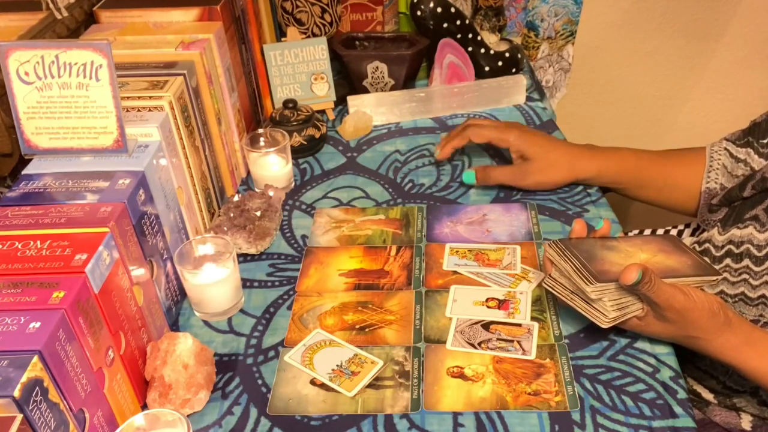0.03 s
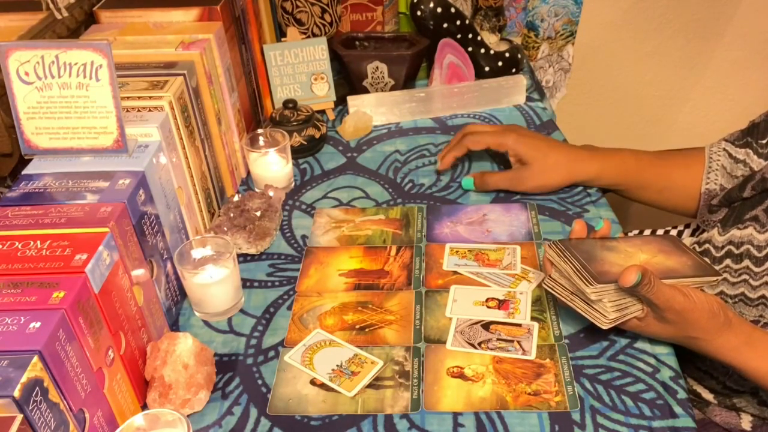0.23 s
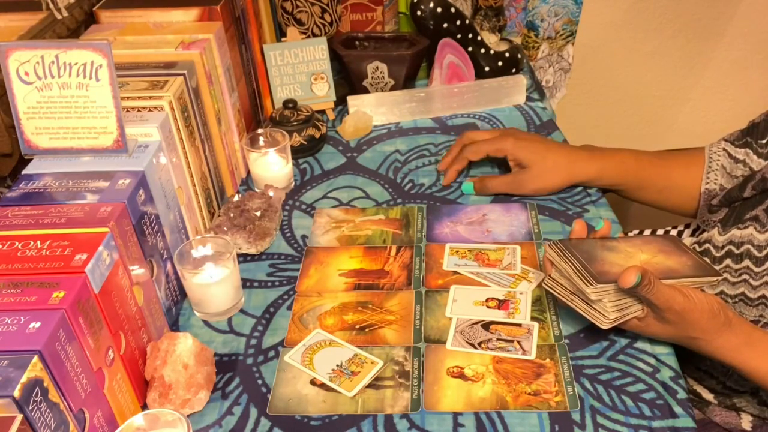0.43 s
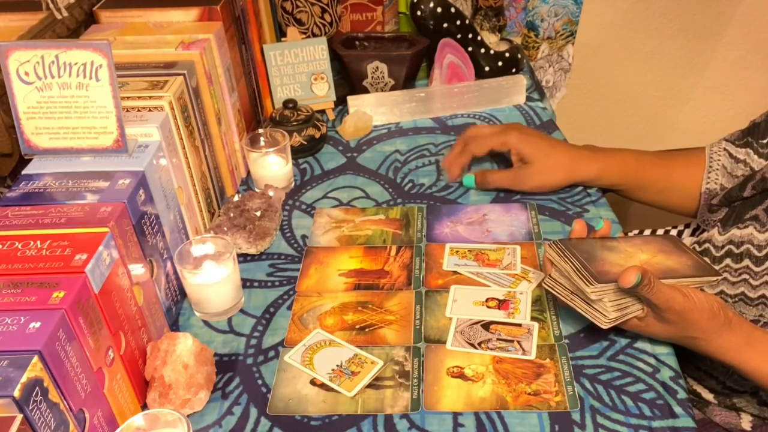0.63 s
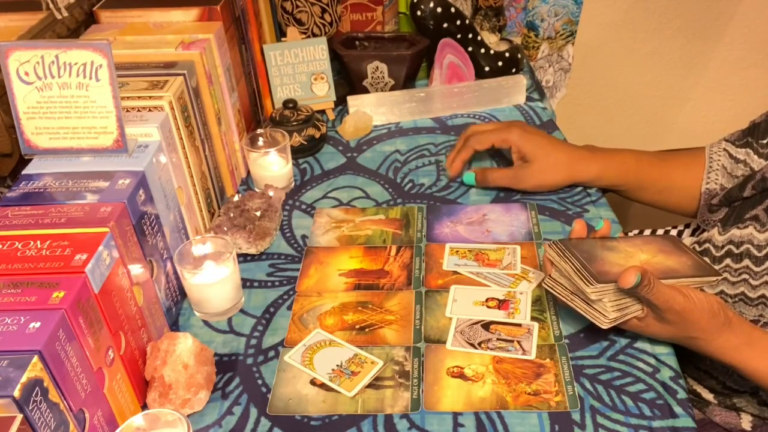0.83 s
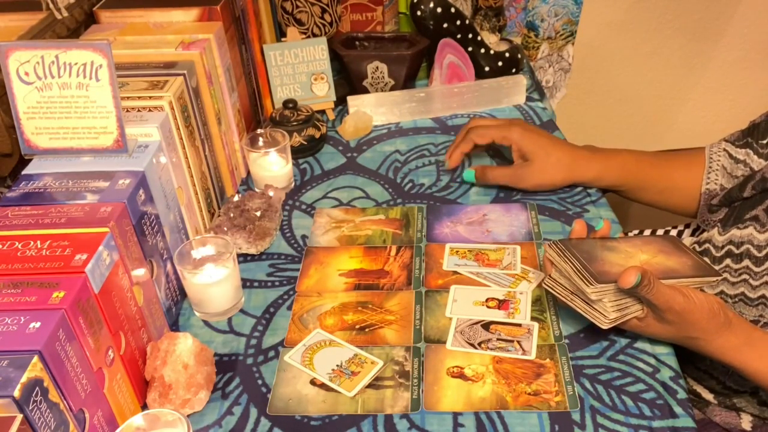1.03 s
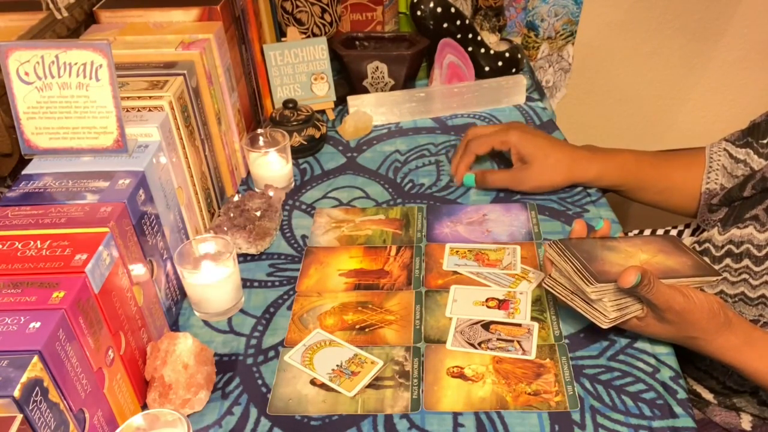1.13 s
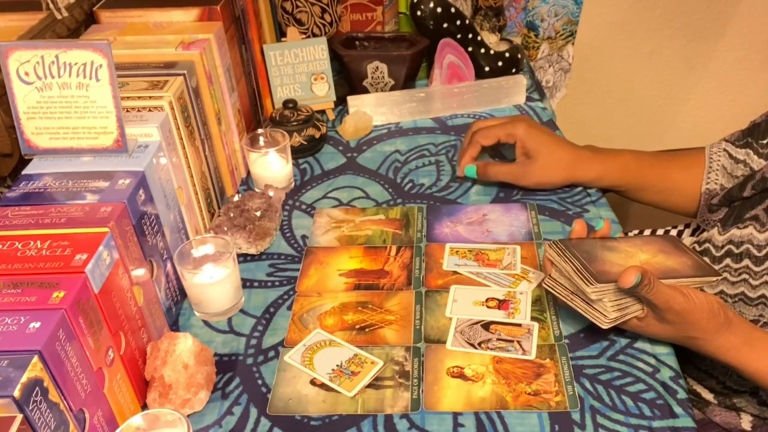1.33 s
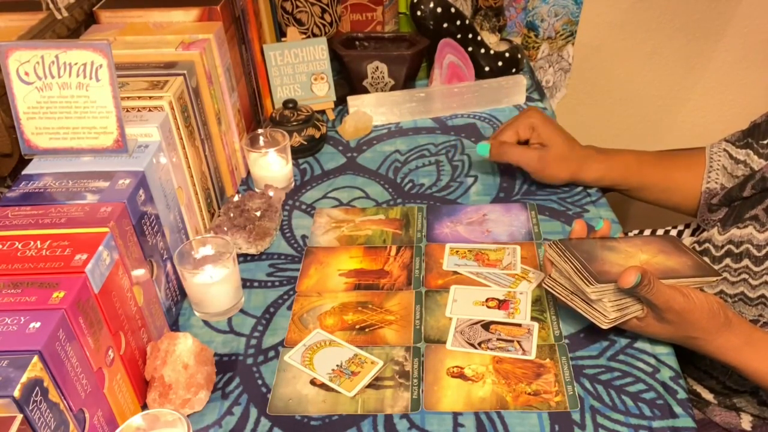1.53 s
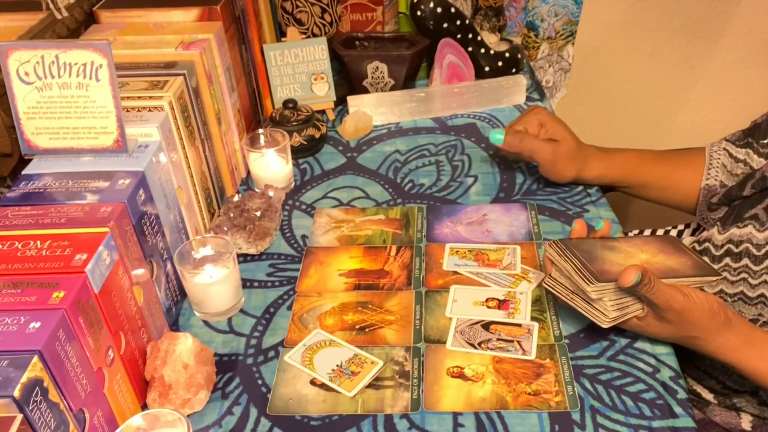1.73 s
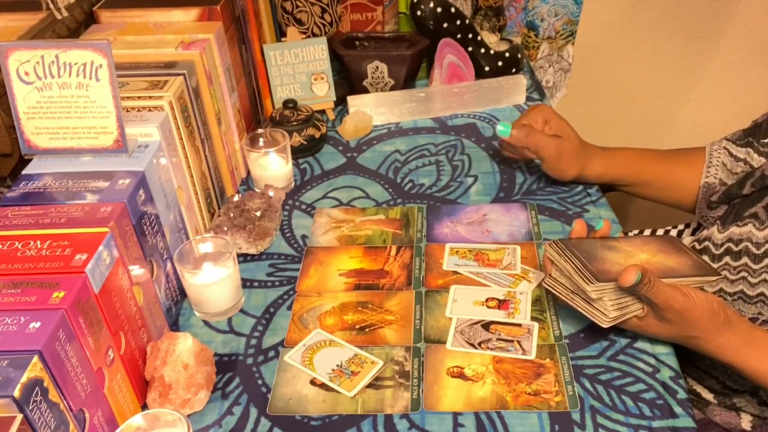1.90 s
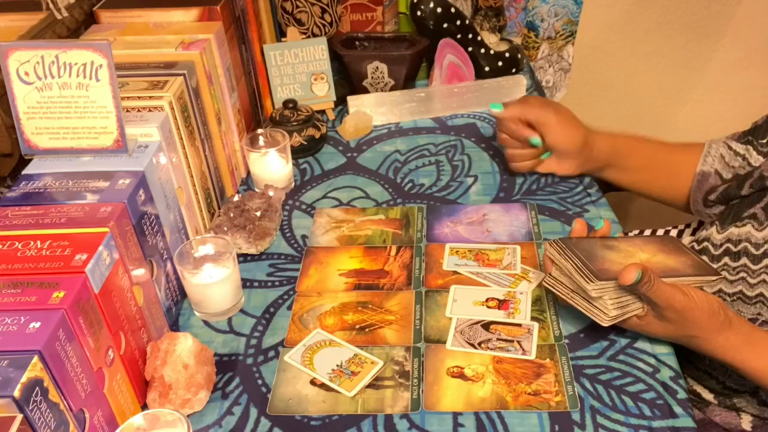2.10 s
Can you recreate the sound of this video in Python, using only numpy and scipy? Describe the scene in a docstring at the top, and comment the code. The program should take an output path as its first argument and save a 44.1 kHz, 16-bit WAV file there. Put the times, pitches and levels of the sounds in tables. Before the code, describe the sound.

One bright finger snap ends a slow, even run of muffled fingertip taps on a covered wooden table. A short room echo, then faint cloth rustles over soft rumble and hiss, picked up closely in stereo.

```python
"""Table taps and a snap

Fingertips tap a cloth-covered wooden table in a quiet room, mostly stronger as they go on, up to a sharp snap.
Each tap is a set of dying waves, knock first and bass later; the snap and the brushes on the cloth are shaped noise.
Behind them lie low rumble, hiss and a thin steady tone; two microphone ports drift apart in phase in the treble."""
import sys
import numpy as np
from scipy import signal
from scipy.fft import rfft, irfft, next_fast_len
from scipy.io import wavfile
from scipy.ndimage import uniform_filter1d

SR = 44100
rng = np.random.default_rng(int(sys.argv[2]) if len(sys.argv) > 2 else 0)


def bounce(signal):
    """Save signal as a 16-bit WAV file at the path given by the first command-line argument."""
    frames = np.transpose(np.atleast_2d(signal))
    limited = np.clip(frames, -1, 1)
    pcm = np.round(limited * 32767).astype(np.int16)
    wavfile.write(sys.argv[1], SR, pcm)


N = 95300  # length in samples

# Taps: [t/s, bass crest after t/s, then level/dB of deep thump, low boom, upper boom, panel, knock, nail tick]
TAPS = [(0.0703, .017, -42, -37.5, -40.5, -61.5, -56, -47.5),
        (0.3145, .016, -39.5, -43, -52, -61, -68, -57), (0.5898, .014, -35, -33, -39, -39.5, -35, -48.5),
        (0.8237, .014, -35.5, -40, -40, -34, -31, -49), (1.071, 0.01263, -38.5, -51, -37, -29, -28, -37.5),
        (1.0776, 0.016, -56, -37.5, -31.5, -31, -26.5, -38),
        (1.333, .014, -53, -50.5, -48.5, -41, -34, -50)]
# Ringing modes of the table, one list for each of the first five tap levels: [f/Hz, level/dB, t60/s]
TABLE_MODES = [
    [(57, 3.5, 0.31)],
    [(101.1, 4, 0.23)],
    [(125.9, 8.5, 0.16)],
    [(188.6, -10.5, 0.2), (233.4, 4.5, 0.085), (277, -10.5, 0.17), (339, -6.5, 0.18)],
    [(422, -14, 0.084), (553, 8, 0.017), (473, -8, 0.071), (642, -11, 0.072), (738, -13, 0.078),
     (1185, -20.5, 0.054), (1440, -18, 0.039)],
]
# Resonances of the nail tick: [f/Hz, width/Hz, level/dB]
NAIL_PEAKS = [(1370, 265, 14.5), (2050, 100, 5), (3380, 560, 6), (4650, 910, 3), (7150, 760, -6)]
# Tiny bright clicks on their own: [t/s, level/dB]
LONE_CLICKS = [(1.1384, -46.5), (1.6556, -49.5)]
# Resonances of those clicks: [f/Hz, width/Hz, level/dB]
CLICK_PEAKS = [(3500, 830, 0), (7400, 2100, 0), (12700, 2700, -4.5)]
# Parts of the snap, a lead-in scrape and then the crack: [t/s, level/dB, rise/s, t60/s]
SNAP_PARTS = [(1.334, -21.5, 0.0013, 0.019), (1.3422, -5.5, 0.0059, 0.035)]
# Resonances of hand and table top in the snap: [f/Hz, width/Hz, level/dB]
SNAP_PEAKS = [(1280, 84, 6.5), (1463, 175, 4), (1774, 330, 5.5), (1975, 58, 9.5), (2180, 53, -9.5),
              (2680, 240, -0.5), (3390, 530, -0.5), (4260, 1160, -5), (6750, 300, -9), (7660, 1200, -17),
              (11600, 3000, -18.5), (15400, 870, -21)]
# Extra brightness of the snap on the left port: [f/Hz, width/Hz, level/dB]
SNAP_LEFT_PEAKS = [(4440, 530, -6.5)]
# Brushes on the cloth: [t/s, length/s, level/dB, brightness/(dB per octave)]
BRUSHES = [(1.364, .09, -56, 0), (1.925, 0.13, -60.5, -1), (2.048, 0.05, -66, 8)]
# Noise colour of the cloth, only its shape counts: [f/Hz, level/(dB per Hz)]
CLOTH_COLOUR = [(400, -8.5), (1000, -10), (1900, -10.5), (3000, -20), (4500, -14.5), (8000, -13),
                (12000, -13), (14000, -13), (15700, -27)]
# How long the room takes to fall by 60 dB: [f/Hz, t60/s]
ROOM_T60 = [(200, 0.28), (2000, 0.18), (10000, 0.1)]
# Noise colour of the rumble, only its shape counts: [f/Hz, level/(dB per Hz)]
RUMBLE_COLOUR = [(12, -41), (20, -7.5), (59, 0), (73, -4), (86, -11), (123, -5), (156, -28), (189, -21),
                 (300, -37), (400, -25.5), (520, -61), (880, -120)]
# Noise colour of the hiss, only its shape counts: [f/Hz, level/(dB per Hz)]
HISS_COLOUR = [(150, 0.5), (400, -3.5), (1000, -12.5), (2500, -17), (6000, -22), (8500, -20),
               (11000, -24.5), (13500, -27), (14500, -29), (15700, -53)]
# Likeness of the noise at the two ports, 1 = the same: [f/Hz, likeness/1]
ALIKE = [(60, 0.81), (200, 0.2), (500, 0.023), (6000, 0.061), (8000, 0.48), (9200, 1), (10100, 0.95),
         (10900, 0.42), (11800, .99), (12800, 0.65), (13400, 0.54), (14200, .99)]
# Phase lead of the right port over the left: [f/Hz, lead/radians]
RIGHT_LEADS = [(0, 0), (6200, 0), (8000, 1.5), (9200, 3.14), (10000, 3.14), (11500, 6.28), (13000, 6.28),
               (14000, 9.42), (16000, 9.42)]

KNOCK_HZ = 528  # modes above this arrive at once
TRAVEL_S = 0.0042  # delay of the bending wave at a quarter of KNOCK_HZ
SWELL_CYCLES, BASS_RISE_S = 0.63, 0.011  # rise of a higher mode in its own cycles; start of bass to crest
GAP_HZ, GAP_WIDTH_HZ = 830, 250  # the table radiates little here
NAIL_T60_S = 0.018
ROOM_DB, SNAP_ROOM_DB = -12, -9  # room echo of the taps and of the snap
RUMBLE_DB, HISS_DB = -56, -66
TONE_HZ, TONE_DB = 1081, -72.5  # level on the left port
TONE_RIGHT = -1.63  # right port's gain against the left; minus turns the wave upside down
PAN_DB, RUMBLE_PAN_DB = 1.1, 0.8  # left up and right down by this much
BOTTOM_HZ, TOP_HZ = 40, 15750  # band that the ports let through


def bass_ring(after, crest, hz):
    """A bass mode swells slowly; its cosine has a peak at the crest shared by all bass modes of the tap."""
    t = np.maximum(after - (crest - BASS_RISE_S), 0)
    swell = 1 - np.exp(-(t / (BASS_RISE_S / np.sqrt(2))) ** 2)
    return t, swell * np.cos(2 * np.pi * hz * (after - crest))


def knock_ring(after, hz):
    """A higher mode swells within about a cycle; bending waves travel slower at low pitch, so it comes later."""
    delay = TRAVEL_S * max(np.sqrt(KNOCK_HZ / hz) - 1, 0)
    t = np.maximum(after - delay, 0)
    swell = 1 - np.exp(-(t / (SWELL_CYCLES / hz)) ** 2)
    return t, swell * np.sin(2 * np.pi * hz * t)


def table_taps():
    """Every tap rings the same table modes at its own levels and adds a nail tick of filtered noise."""
    wood, nail = np.zeros(N + SR), np.zeros(N)
    after = np.arange(SR // 3) / SR  # seconds since the tap
    fade = np.cos(np.pi / 2 * after / after[-1])  # brings the ring to zero at its end
    for s, crest, *levels_db, nail_db in TAPS:
        start = round(s * SR)
        for level_db, modes in zip(levels_db, TABLE_MODES):
            is_bass = len(modes) == 1
            for k, (hz, db, t60) in enumerate(modes):
                t, wave = bass_ring(after, crest, hz) if is_bass else knock_ring(after, hz)
                ring = amp(level_db + db - 60 * t / t60) * wave
                # neighbouring modes take opposite signs
                wood[start:start + len(after)] += (-1) ** k * ring * fade
        nail += burst(s, nail_db, 0.0017, NAIL_T60_S)
    gap = resonances([(GAP_HZ, GAP_WIDTH_HZ, -1)])
    wood = filtered(wood[:N], lambda hz: 1 - gap(hz))
    clicks = sum(burst(s, db, 0.00015, 0.0057) for s, db in LONE_CLICKS)
    return wood + filtered(nail, resonances(NAIL_PEAKS)) + filtered(clicks, resonances(CLICK_PEAKS))


def snap():
    """Short noise bursts excite the resonances of hand and table top, with more brightness on the left."""
    crack_noise = sum(burst(*part) for part in SNAP_PARTS)
    left_noise = sum(burst(*part) for part in SNAP_PARTS)
    crack = filtered(crack_noise, resonances(SNAP_PEAKS))
    left_extra = filtered(left_noise, resonances(SNAP_LEFT_PEAKS))
    return np.array([crack + left_extra, crack])


def brushes():
    """Skin slides over the weave: soft swells of slightly grainy noise."""
    out, t = np.zeros((2, N)), np.arange(N) / SR
    for s, length, db, tilt_db in BRUSHES:
        progress = np.clip((t - s) / length, 0, 1)
        swell = np.sin(np.pi * progress ** 0.59) ** 1.1
        wander = unit(uniform_filter1d(rng.standard_normal(N), 300))
        grain = amp(1.5 * wander)  # small random changes in loudness
        colour = [(hz, level + tilt_db * np.log2(hz / 4000)) for hz, level in CLOTH_COLOUR]
        out += amp(db) * swell * grain * pair(colour)
    return out


def room(x):
    """The room answers with a tail of noise in which each frequency dies at its own speed."""
    noise = pair([(20, 0.0067), (20000, 0)])[:, :SR // 2]
    hz, t, z = signal.stft(noise, SR, nperseg=256)
    decay = amp(-60 * t / along(ROOM_T60, hz)[:, None])
    tail = signal.istft(z * decay, SR, nperseg=256)[1]
    tail = tail / np.linalg.norm(tail[0])
    late = np.pad(x, (150, 0))  # the answer starts 150 samples late
    return signal.fftconvolve(late[None], tail, axes=1)[:, :N]


def air():
    """Steady background: two coloured noises for rumble and hiss, and a sine for the thin tone."""
    rumble = amp(RUMBLE_DB) * amp([[RUMBLE_PAN_DB], [-RUMBLE_PAN_DB]]) * pair(RUMBLE_COLOUR)
    hiss = amp(HISS_DB) * pair([(60, -47)] + HISS_COLOUR)
    sine = np.sin(2 * np.pi * TONE_HZ * np.arange(N) / SR)
    tone = amp(TONE_DB) * sine * np.array([[1], [TONE_RIGHT]])
    return rumble + hiss + tone


def burst(s, db, rise, t60):
    """Noise that rises quickly at s seconds and then dies, by 60 dB in each t60."""
    t = np.maximum(np.arange(N) / SR - s, 0)
    decay = amp(np.maximum(db - 60 * t / t60, -200))
    return decay * (1 - np.exp(-t / rise)) * rng.standard_normal(N)


def pair(colour):
    """Stereo noise of rms 1: mixing a shared part with an opposed part sets how alike the ports are."""
    def response(hz):
        turn = np.arccos(np.clip(along(ALIKE, hz), 0, 1)) / 2
        return amp(along(colour, hz)) * np.array([np.cos(turn), np.sin(turn)])
    mid, side = filtered(rng.standard_normal((2, N)), response)
    return unit(np.array([mid + side, mid - side]))


def resonances(peaks):
    """Response of a set of ringing peaks, with signs that alternate from one peak to the next."""
    def response(f):
        total = 0
        for k, (centre, width, db) in enumerate(peaks):
            damping = 1j * f * width
            total = total + (-1) ** k * amp(db) * damping / (centre * centre - f * f + damping)
        return total
    return response


def filtered(x, response):
    """Multiply the spectrum of x by a response, with spare room at the end so the sound does not wrap round."""
    m = next_fast_len(N + SR // 2)
    return irfft(rfft(x, m) * response(np.fft.rfftfreq(m, 1 / SR)), m)[..., :N]


def along(points, hz):
    """Read a value between (f/Hz, value) points, on a log frequency axis."""
    f, v = np.transpose(points)
    return np.interp(np.log(hz + 1), np.log(f + 1), v)


def unit(x):
    """Scale x to an rms of 1."""
    return x / np.sqrt(np.mean(x ** 2) + 1e-20)


def amp(db):
    """Turn decibels into a plain factor."""
    return 10 ** (np.asarray(db) / 20)


def scene():
    """Add taps, snap, their room echo, brushes and background."""
    taps, crack = table_taps(), snap()
    # the room hears the taps with little bass
    thin_taps = filtered(taps, lambda f: (1j * f / (250 + 1j * f)) ** 2)
    echo = room(amp(ROOM_DB) * thin_taps + amp(SNAP_ROOM_DB) * crack[1])
    panned_taps = taps * amp([[PAN_DB], [-PAN_DB]])
    return panned_taps + crack + echo + brushes() + air()


def record(dry):
    """The ports cut the deep bass and everything above a limit, and turn apart in phase in the treble."""
    f, lead = np.transpose(RIGHT_LEADS)
    b, a = signal.butter(3, BOTTOM_HZ, "high", analog=True)

    def response(hz):
        bass_cut = signal.freqs(b, a, hz)[1]
        # half the lead goes to each port, in opposite directions
        turn = np.exp(0.5j * np.interp(hz, f, lead) * np.array([[-1], [1]]))
        return bass_cut * turn * (hz < TOP_HZ)
    return filtered(dry, response)


dry = scene()
out = record(dry)
bounce(out)
```